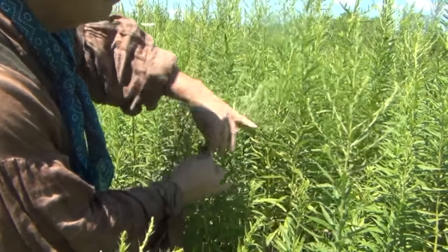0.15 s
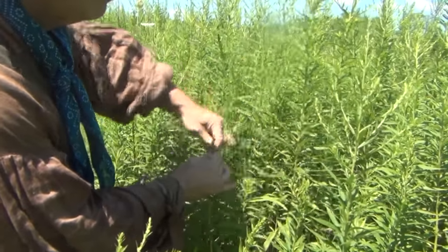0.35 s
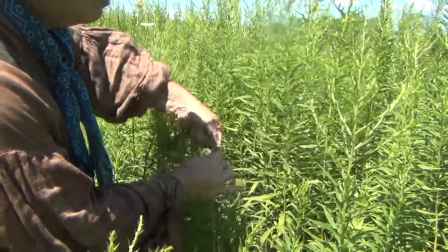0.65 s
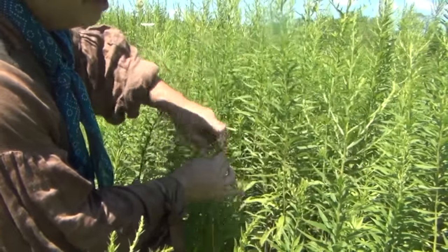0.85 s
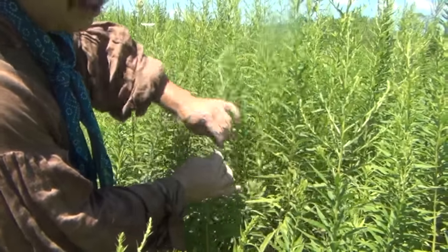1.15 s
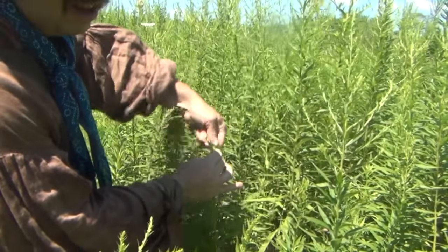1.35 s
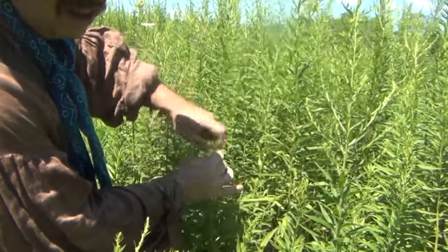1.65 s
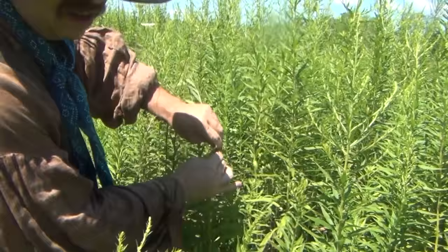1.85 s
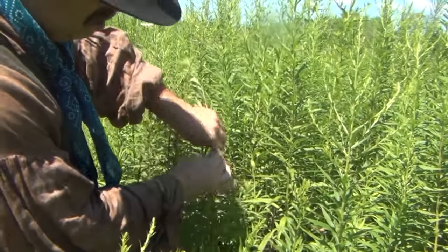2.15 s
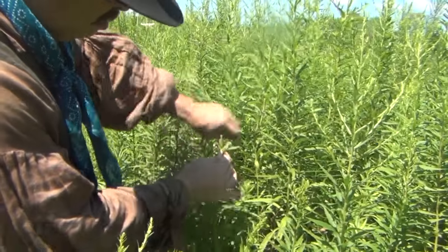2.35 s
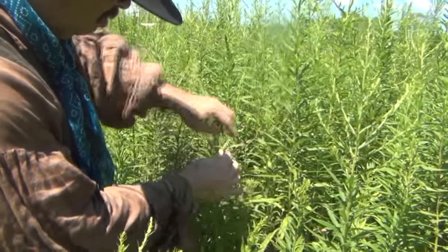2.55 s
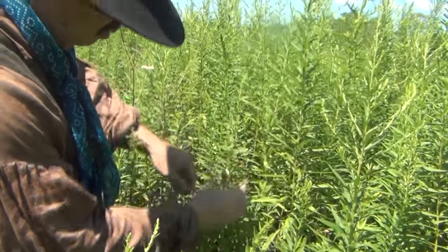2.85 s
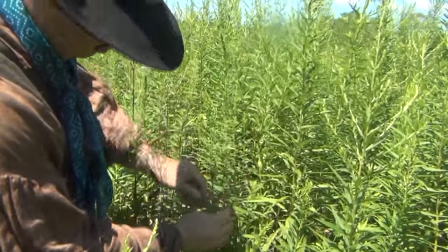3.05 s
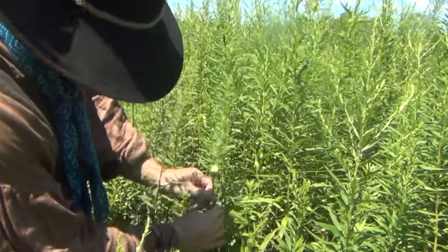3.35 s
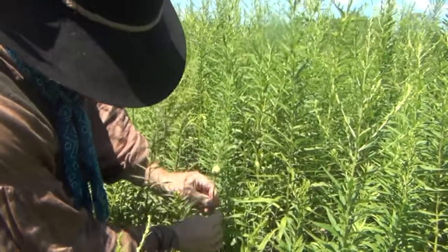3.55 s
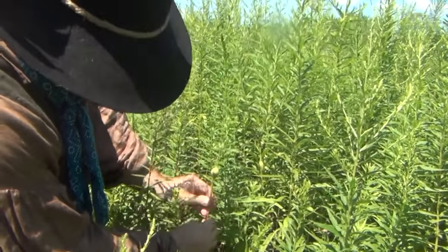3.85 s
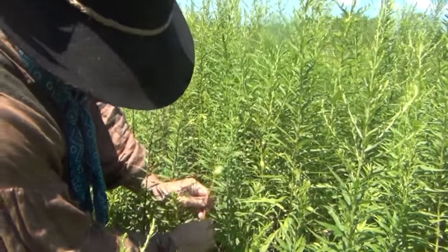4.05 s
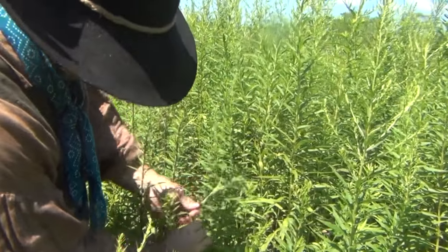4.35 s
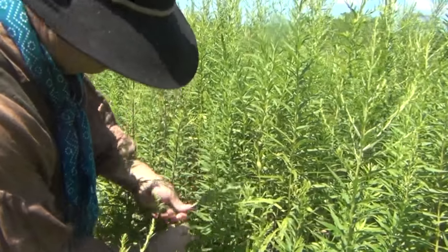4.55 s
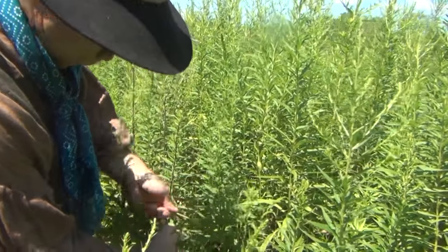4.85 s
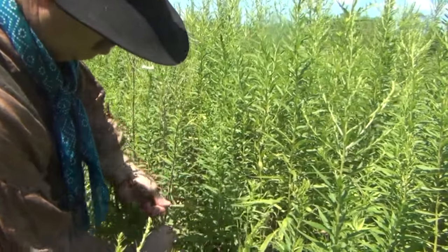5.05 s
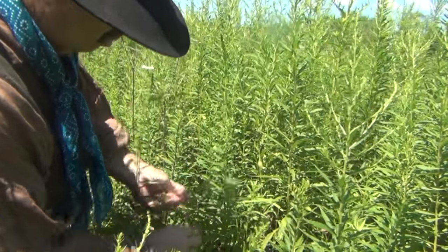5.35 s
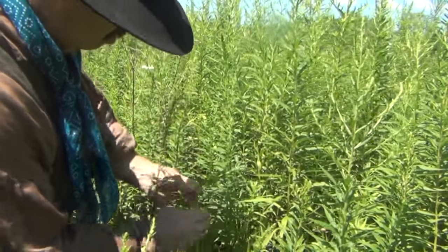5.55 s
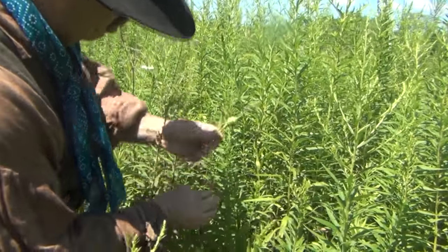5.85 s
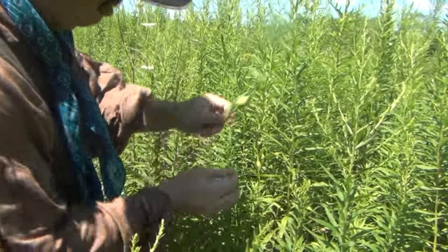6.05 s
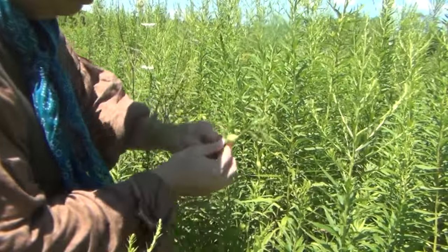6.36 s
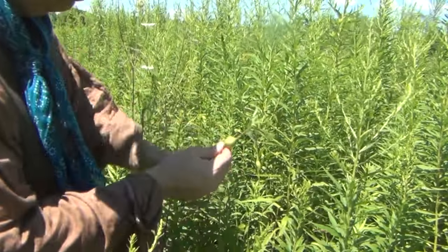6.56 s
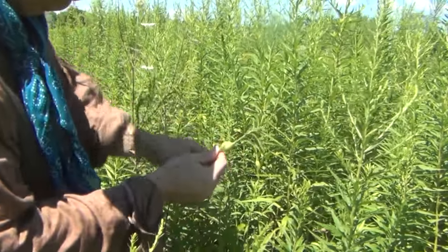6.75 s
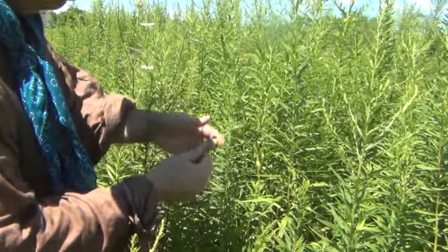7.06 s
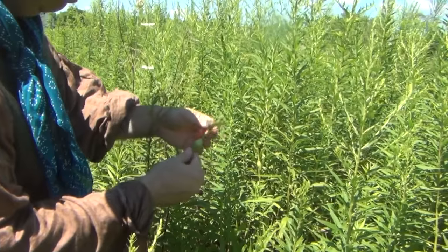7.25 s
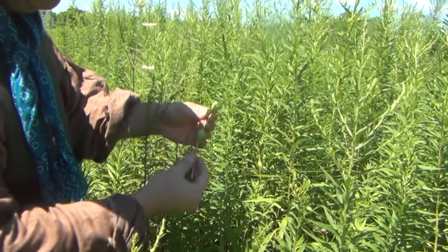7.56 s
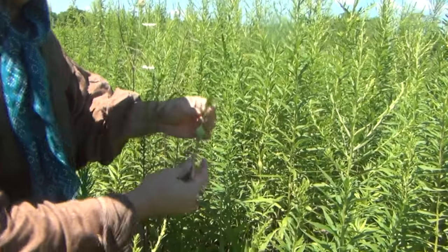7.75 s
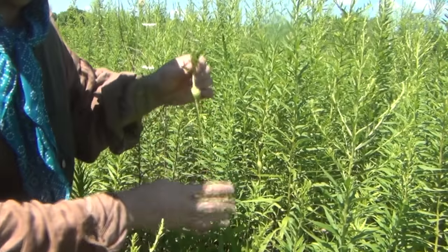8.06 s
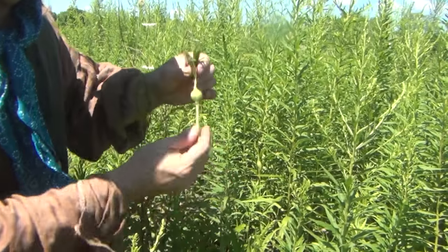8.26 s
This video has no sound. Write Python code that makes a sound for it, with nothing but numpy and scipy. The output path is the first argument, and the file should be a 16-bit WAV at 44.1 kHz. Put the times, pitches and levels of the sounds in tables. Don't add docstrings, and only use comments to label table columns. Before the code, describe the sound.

In an open field, a fast, shimmering insect trill runs throughout over low breeze and distant traffic. Close up, leaves swish and flick, stalks click, and stems break in three short bursts, the first and last very loud and slightly clipped. The last springs back with a brief thud. Quieter rustling follows, with a faint far bird warble near the end. A camera microphone adds hiss and faint buzzing; the left side is silent.

```python
import sys
import numpy as np
from scipy import signal
from scipy.io import wavfile
from scipy.ndimage import uniform_filter1d

SR = 44100
rng = np.random.default_rng(int(sys.argv[2]) if len(sys.argv) > 2 else 0)


def rack_gain(trim_db):
    fader = np.asarray(trim_db, float)
    return 10 ** (fader / 20)


def wrap_up_sound(samples):
    columns = np.atleast_2d(samples).T
    tamed = np.clip(columns, -1, 1)
    steps = np.round(tamed * 32767).astype(np.int16)
    wavfile.write(sys.argv[1], SR, steps)


N = 369999


def evened(x):
    return x / np.sqrt(np.mean(x ** 2) + 1e-20)


def curve(rows):
    s, *columns = np.transpose(rows)
    return [np.interp(np.arange(N) / SR, s, c) for c in columns]


def band(x, lo_hz, hi_hz, order=3):
    sos = signal.butter(order, [lo_hz, min(hi_hz, 20000)], "band", fs=SR, output="sos")
    return signal.sosfilt(sos, x)


def colour(x, points):
    f, db = np.transpose(points)
    hz = abs(np.fft.fftfreq(4096, 1 / SR))
    gain_db = np.interp(np.log(hz + 1), np.log(f + 1), np.maximum(db, -70))
    log_gain = np.log(rack_gain(gain_db))
    taps = np.fft.ifft(np.exp(np.conj(signal.hilbert(log_gain)))).real
    return signal.oaconvolve(x, taps)[:N]


def wander(seconds):
    span = max(round(seconds * SR), 1)
    smooth = uniform_filter1d(rng.standard_normal(N), span)
    return evened(uniform_filter1d(smooth, span))


def scatter(x, t60):
    t = np.arange(8000) / SR
    sign = rng.choice([-1., 1.], t.size)
    taps = sign * (rng.random(t.size) < .05) * rack_gain(-60 * t / t60)
    return signal.oaconvolve(x, taps / np.linalg.norm(taps))[:N]


# ms from the top of the pitch arch, pitch shift in Hz, strength from 0 to 1.
WING_STROKE = [(-8.5, -280, 0), (-6, -170, .75), (-3.5, -50, .95), (0, 0, 1), (4, -80, .9), (6, -180, .75),
               (9, -480, .58), (11, -720, .4), (12.5, -830, 0)]


def cricket(per_s, top_hz, lag_ms, level_db):
    beat = (np.arange(N) / SR - lag_ms / 1000) * per_s
    from_top = (beat + .5) % 1 - .5
    ms = from_top * 1000 / per_s + .5 * wander(.06)
    at, shift_hz, strength = np.transpose(WING_STROKE)
    hz = top_hz + np.interp(ms, at, shift_hz) + 25 * wander(.03) + 40 * wander(.002)
    uneven_db = 1.5 * wander(.03) + 1.5 * wander(.002)
    level = rack_gain(level_db + 8 + uneven_db) * np.interp(ms, at, strength)
    return level * np.sin(2 * np.pi * np.cumsum(hz) / SR)


# time in seconds, lag of the stroke behind a steady beat in ms, level in dB.
SINGER_A = [(0, 31, -47), (.3, 41, -42.5), (1.1, 27, -39), (1.8, 27.7, -41), (2.15, 32, -45),
            (2.6, 47, -57), (3.3, 32.6, -43), (3.9, 45.6, -44), (4.8, 33.8, -45.5), (5.1, 36, -44),
            (5.4, 54, -51), (8.4, 63, -47)]
SINGER_B = [(0, 36.2, -42.5), (1.2, 31.8, -45), (1.999, 38.4, -47), (2.4, 40.6, -59), (3.2, 36.6, -46.5),
            (3.6, 36, -44.5), (4.802, 32.65, -47), (5.2, 35.17, -44), (5.599, 36, -46), (6.0, 32.66, -45),
            (7.0, 22.4, -51), (8.4, 34, -47.5)]
SINGER_C = [(0, 33.3, -48), (.8, 30.4, -38), (1.2, 30.5, -66), (1.6, 31, -67), (2.5, 27.6, -51),
            (3.2, 30.8, -41.5), (3.6, 31.8, -44.5), (5.2, 32.67, -43.5), (6.0, 35.2, -65), (6.8, 40.1, -45),
            (7.4, 43.9, -51), (8.0, 39.5, -43.5)]
SINGER_D = [(0, 35.4, -50), (.7, 28.2, -43), (1.2, 29.3, -41.5), (2.2, 33.1, -46.5), (3.1, 27.5, -46.5),
            (4.0, 36.27, -46), (4.8, 32.36, -40.5), (6.4, 32.76, -43), (6.8, 34, -47.5),
            (7.6, 40.92, -47.5), (8.4, 39.2, -40)]
SINGER_E = [(0, 39.5, -64), (.8, 50.4, -57), (1.7, 71, -62), (3.699, 92, -50), (4.398, 94.6, -58),
            (5.1, 103.7, -68), (6.1, 108.8, -52), (7.2, 113.8, -51.5), (8.0, 111.3, -52), (8.4, 115.8, -57)]
SINGER_STROKES = [19.55, 19.6, 20.3, 18.4, 17.85]
SINGER_TOP_HZ = [8440, 8950, 8730, 8650, 8230]
# time in seconds, gain in dB.
CHORUS_GAIN = [(0, 3), (.4, 2), (.9, -1.5), (1.9, 0.5), (2.3, 4.5), (2.7, 3.5), (3.3, -0.5), (4.2, 2.5),
               (4.6, 2), (5.2, 2), (5.7, 1.5), (6.1, -0.4), (7.2, 1.7), (8.4, -0.9)]


def crickets():
    tables = [SINGER_A, SINGER_B, SINGER_C, SINGER_D, SINGER_E]
    near, far = np.zeros(N), np.zeros(N)
    for per_s, top_hz, rows in zip(SINGER_STROKES, SINGER_TOP_HZ, tables):
        near += cricket(per_s, top_hz, *curve(rows))
    for top_hz in np.linspace(7800, 8900, 5):
        per_s, lag_ms = 19.0 + 3.2 * rng.random(), 55 * rng.random()
        far += cricket(per_s, top_hz, lag_ms, 1.0 * wander(0.98))
    chorus = rack_gain(-2) * near + rack_gain(-5) * scatter(near, t60=.055)
    chorus += rack_gain(-49) * evened(scatter(far, t60=.05))
    return rack_gain(*curve(CHORUS_GAIN)) * chorus


# pitch in Hz, strength in dB per Hz.
AIR_TONE = [(15, -55), (25, -4), (64, -11), (140, 13.5), (199, -11), (319, -4.5), (499, -9.5), (781, -10),
            (1110, -12), (1620, -15.5), (1960, -18), (2730, -22), (3000, -22), (7000, -23), (9100, -61),
            (15400, -120)]


def air():
    wash = band(colour(rng.standard_normal(N), AIR_TONE), 231, 10300) * rack_gain(0.09 * wander(0.11))
    hiss = band(rng.standard_normal(N), 10500, 19000)
    return rack_gain(-49) * evened(wash) + rack_gain(-64) * evened(hiss)


# time in seconds, level in dB.
BREEZE_LEVEL = [(0, -57), (3.3, -57.5), (4.25, -46), (4.85, -43), (5.45, -54), (8.39, -51)]
# time in seconds, level in dB.
TRAFFIC_LEVEL = [(0, -52.5), (3.2, -45.5), (3.6, -48), (4.3, -47), (5.5, -51), (6.7, -53), (7.1, -49),
                 (8.39, -45)]
# time in seconds, level in dB.
TYRE_LEVEL = [
    (2.6, -64),
    (3.2, -56),
    (6.5, -57),
    (7.0, -59),
]


def rumble():
    breeze_db, = curve(BREEZE_LEVEL)
    traffic_db, = curve(TRAFFIC_LEVEL)
    deep = rack_gain(breeze_db + 0.5 * wander(0.18)) * evened(band(rng.standard_normal(N), 41.3, 95))
    hum = rack_gain(traffic_db + 1.0 * wander(0.094)) * evened(band(rng.standard_normal(N), 107.0, 221.0))
    tyres = rack_gain(*curve(TYRE_LEVEL)) * evened(band(rng.standard_normal(N), 568, 770))
    return deep + hum + tyres


# first start in seconds, pitch in Hz, glide in Hz per second, length in seconds, level in dB.
FRAME_BURSTS = [(.028, 1500, 9000., .007, -53), (.0265, 2330, 62000., .01, -50.5),
                (.037, 2800, 900., .011, -59), (.028, 5000, 40000., .008, -60)]


def buzz():
    frame_hz, line_hz = 30 / 1.001, 15750 / 1.001
    t = np.arange(N) / SR
    out = rack_gain(-75) * np.sin(2 * np.pi * line_hz * t)
    for start, hz, glide, length, db in FRAME_BURSTS:
        frame, u = np.divmod(t - start, 1 / frame_hz)
        swell = np.sin(np.pi * np.clip(u / length, 0, 1)) ** 2
        burst = swell * np.sin(2 * np.pi * (hz + glide * u / 2) * u)
        flip = 1 - 2 * (frame % 2)
        out += rack_gain(db + .5 + 1.8 * wander(0.042)) * burst * flip
    return out


# start in seconds, length in seconds, bright rustle in dB, dullness in dB.
HAND_SLIDES = [(0.17, 0.67, -36, -2), (0.701, 0.47, -41, -0.5), (1.17, 0.54, -41.5, -0.3),
               (2.023, 0.24, -45.5, -4), (2.38, 0.34, -45, -0.5), (2.651, 0.29, -40, -3.5),
               (2.855, 0.44, -38.5, 1), (3.297, 0.68, -49, -1.5), (4.103, 0.7, -43.5, -1),
               (4.547, 0.1, -41.5, 3.3), (4.633, .11, -35, -0.5), (4.8, 0.18, -32.5, -6),
               (4.974, 0.19, -40.5, -3), (5.23, 0.16, -39, 2.5), (5.47, .12, -34, -2.5),
               (5.593, 0.21, -42, -2.5), (5.845, 0.53, -49.5, -2), (6.553, 0.16, -42.5, -5.5),
               (7.293, 0.5, -57, -5), (7.793, 0.23, -59, 10), (8.108, 0.24, -48.5, -8)]
# peak in seconds, bright rustle in dB, dullness in dB, fall in dB per second.
LEAF_FLICKS = [(.06, -36, -1.5, 144), (.18, -36, -4, 270), (.36, -33.5, -2, 104), (1.01, -40, 2.5, 170),
               (1.121, -33.5, -1.5, 228), (1.698, -37, 0, 330), (1.8, -37, -1.5, 270),
               (1.92, -42.5, -3, 74), (2.25, -24, -4.5, 119), (2.33, -51, -4, 150), (2.4, -34, -4, 250),
               (3.81, -40, -3, 150), (3.92, -40, -6, 450), (4.05, -42, -11, 350), (4.61, -48, 7.5, 90),
               (4.9, -37.5, 3, 220), (5.301, -50, 5, 120), (5.43, -40, 0.5, 140), (5.762, -22.5, -3.5, 158),
               (6.55, -37.5, -10, 450), (6.91, -49.5, -8, 67), (7.69, -53, 1, 50), (7.9, -60, 0, 500),
               (8.05, -46.5, -5, 180)]
# the levels in dB of their bright, middle and dull rustle.
RESTING_LEAVES = (-54.5, -53.5, -56.5)


def hands():
    t = np.arange(0, N / SR + .01, .002)
    moves = []
    for s, length, db, dull in HAND_SLIDES:
        progress = np.clip((t - s) / length, 0, 1)
        arch = abs(np.sin(np.pi * progress ** .9)) ** .85
        moves.append((db, dull, arch))
    for s, db, dull, fall in LEAF_FLICKS:
        rise = 156 * rack_gain(0.58 * (db + 41.5))
        moves.append((db, dull, rack_gain(-np.maximum(rise * (s - t), fall * (t - s)))))
    power = rack_gain(np.array(RESTING_LEAVES))[:, None] ** 2
    for db, dull, shape in moves:
        ranges_db = db + np.array([0, dull, -8.5 + 1.5 * dull])
        power = power + np.outer(rack_gain(ranges_db), shape) ** 2
    return curve(np.c_[t, 10 * np.log10(power.T)])


# pitch in Hz, strength in dB per Hz.
LEAF_TONE = [(590, -33), (1000, -16.5), (2230, -11.5), (2910, -9.5), (3840, -12.5), (6400, -0.5),
             (7400, -9.5), (8500, -0.5), (9400, 7.5), (10600, 9), (12100, 2.5), (13600, -6), (16300, -15)]


def rustle():
    size = rack_gain(4.0 * np.minimum(rng.exponential(1, N), 4.5)) * rng.choice([-1., 1.], N)
    chance = 1500 / SR * rack_gain(3.0 * wander(.006))
    cracks = evened(size * (rng.random(N) < chance))
    rubbing = rng.standard_normal(N) * rack_gain(2.4 * wander(.011))
    leaves = colour(.75 * cracks + .66 * rubbing, LEAF_TONE)
    bright_db, middle_db, dull_db = (db + 1.5 * wander(.018) for db in hands())
    bright = rack_gain(bright_db - 1.1) * evened(band(leaves, 6570, 16500))
    middle = rack_gain(middle_db + 0.06) * evened(band(leaves, 4100, 9230))
    dull = rack_gain(dull_db - 4.0) * evened(band(leaves, 1030, 4200))
    return bright + middle + dull


# time in seconds, bright part in dB, lower part in dB.
STALK_TICKS = [(.0735, -16.5, -43), (.4206, -21, -35), (.432, -38, -27), (.4409, -20, -30),
               (.4703, -31, -45), (.569, -22, -42), (.6117, -21, -25), (.876, -25, -31),
               (1.2754, -41, -27.5), (1.3496, -20, -29), (1.3922, -16.5, -34), (2.1224, -31, -40),
               (2.5065, -26, -35), (1.9787, -34, -39), (3.135, -28, -35), (3.2761, -28, -32.5),
               (3.8, -26, -36), (4.2765, -25, -33), (4.3046, -22, -33), (4.7105, -27, -30),
               (5.0938, -24.5, -27), (5.1137, -30, -45), (5.4235, -16.5, -26), (5.5035, -27.5, -27.5),
               (5.6012, -26, -39), (6.6187, -18.5, -29), (6.622, -31, -30), (6.8163, -32.5, -31),
               (7.899, -17, -26.5), (7.79, -45, -32)]
# time in seconds, bright part in dB, lower part in dB.
STEM_BREAKS = [(2.22, -22, -23), (2.2384, -16, -16), (2.241, -6.5, -16), (2.2446, -11, -16.5),
               (2.252, -24, -22), (2.2584, -15, -10), (2.2909, -16, -23), (2.326, -21, -29),
               (2.3328, -21, -23), (2.3364, -20, -27), (2.3804, -29, -27), (2.4008, -33, -30),
               (4.8266, -19, -43), (4.8446, -23, -39), (4.8481, -21.5, -38), (4.8513, -22.5, -38),
               (4.8653, -17, -32), (4.899, -13, -29), (4.9026, -16.5, -38), (5.6752, -22, -21.5),
               (5.6773, -17, -26), (5.6943, -19, -32), (5.752, -3.5, -8.5), (5.7558, -5.5, -22),
               (5.7656, -10, -27), (5.7676, -15, -31), (5.8247, -28, -33), (5.8954, -27, -36),
               (5.9086, -28, -28.5)]
# pitch in Hz, strength in dB per Hz.
CRACK_TONE = [(350, -46), (600, -16), (861, -20), (2380, -18), (4450, -11), (5180, -11), (6380, -3),
              (7440, -13), (10500, 1), (15600, -17), (16700, -35)]


def snaps():
    out, t = np.zeros((3, N + 4000)), np.arange(1500) / SR
    out[2, 0] = 1
    for s, bright_db, low_db in STEM_BREAKS + STALK_TICKS:
        splinters = .17 * rng.standard_normal(t.size) * rack_gain(-60 * t / .007)
        burst = splinters + (t == 0)
        start = round((s - .0002) * SR)
        out[:2, start:start + t.size] += rack_gain([[bright_db + 2.5], [low_db + 4]]) * burst
    bright, low, unit = (colour(part, CRACK_TONE) for part in out)
    both = np.zeros(N)
    for part, hz in ((bright, (7600, 20000)), (low, (300, 7300))):
        both += band(part, *hz) / abs(band(unit, *hz)).max()
    return both + rack_gain(-16) * scatter(both, t60=.04)


# time in seconds, pitch in Hz, seconds to fade by 60 dB, level in dB.
SPRING_BACK = (5.753, 220, .1, -28.5)


def thump():
    s, hz, t60, db = SPRING_BACK
    u = np.maximum(np.arange(N) / SR - s, 0)
    return rack_gain(db - 60 * u / t60) * np.sin(2 * np.pi * hz * u)


# start in seconds, length in seconds, pitch in Hz, waver in Hz, wavers per second, level in dB.
WARBLE = (7.72, .5, 3290, 70, 9, -60.5)


def bird():
    s, length, hz, waver_hz, per_s, db = WARBLE
    u = np.clip((np.arange(N) / SR - s) / length, 0, 1)
    pitch = hz + waver_hz * np.sin(2 * np.pi * per_s * length * u) + 45 * wander(.006)
    level = rack_gain(db + 5.6 * wander(.012)) * np.sin(np.pi * u) ** .6
    return level * np.sin(2 * np.pi * np.cumsum(pitch) / SR)


def scene():
    mix = crickets() + air() + rumble() + buzz() + rustle() + snaps() + thump() + bird()
    return np.array([0 * mix, 2 * mix])


def band_limit(x):
    return signal.sosfilt(signal.butter(12, 16050, fs=SR, output="sos"), x)


def record(dry):
    finished = np.clip(dry, -1, 1)
    return band_limit(finished)


dry = scene()
out = record(dry)
wrap_up_sound(out)
```